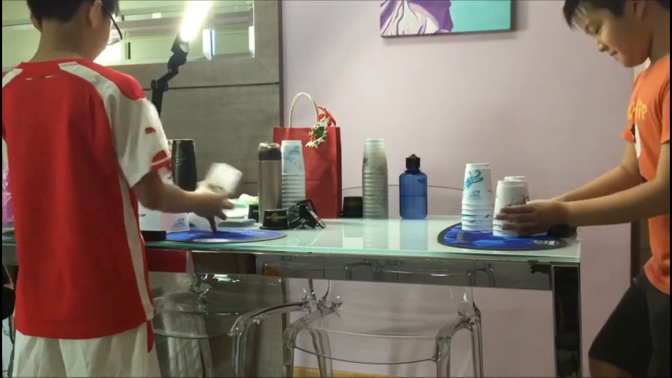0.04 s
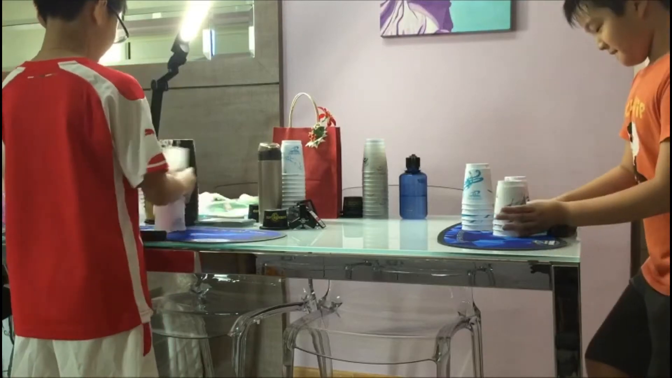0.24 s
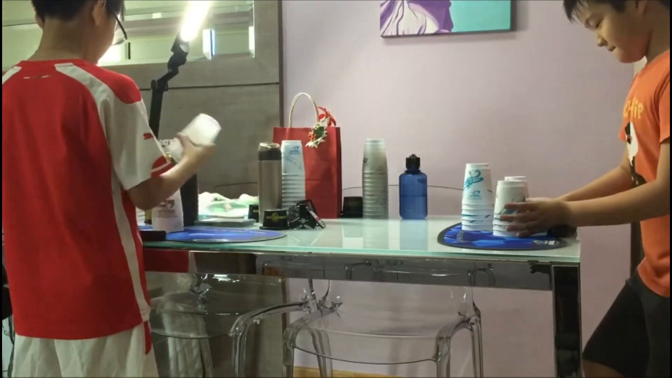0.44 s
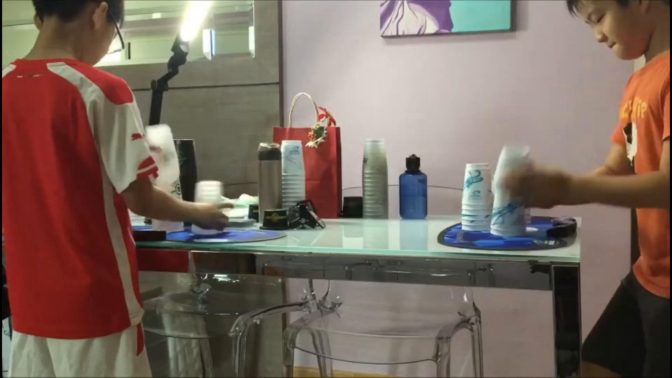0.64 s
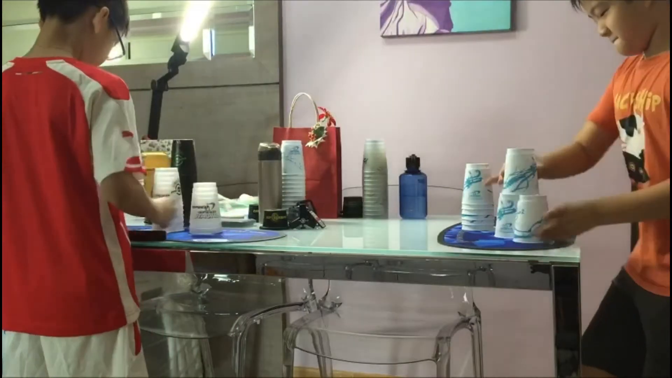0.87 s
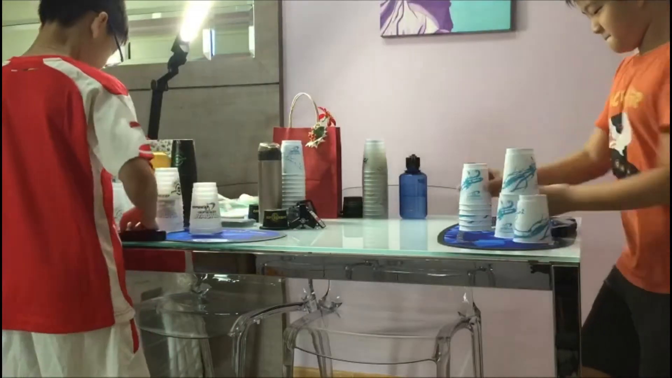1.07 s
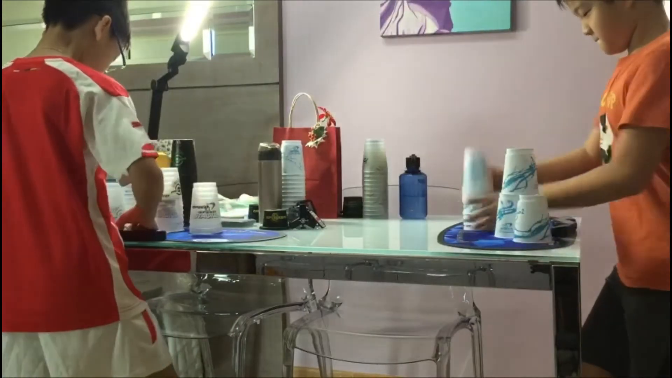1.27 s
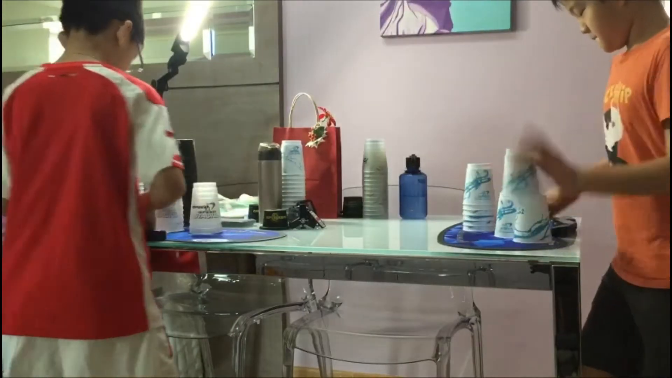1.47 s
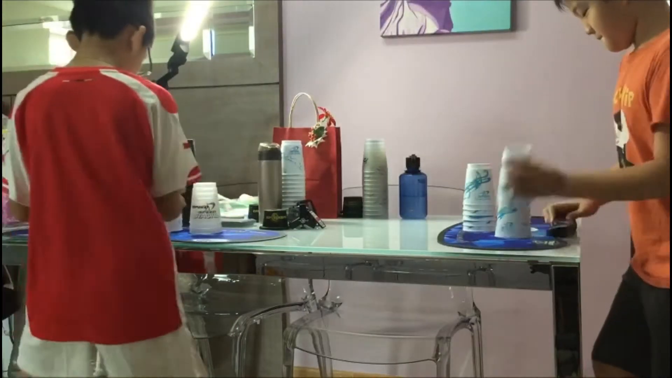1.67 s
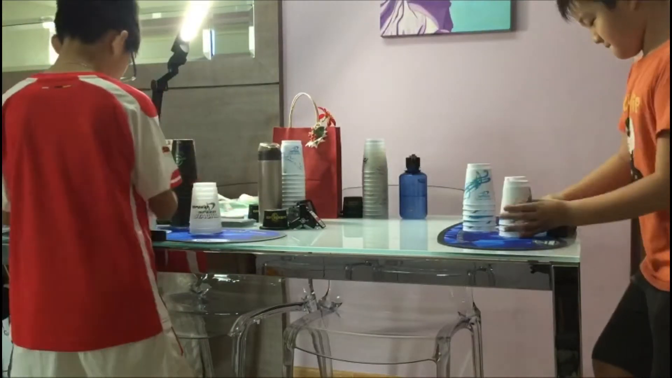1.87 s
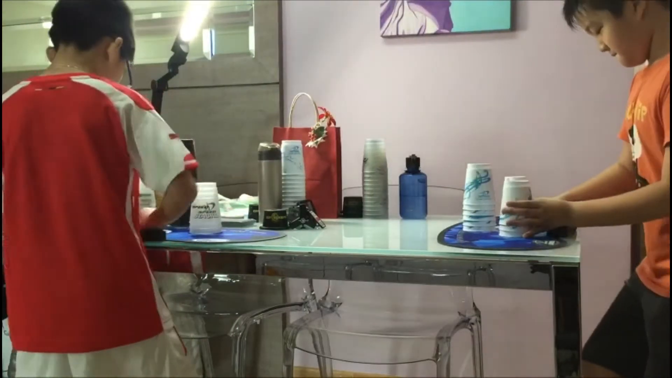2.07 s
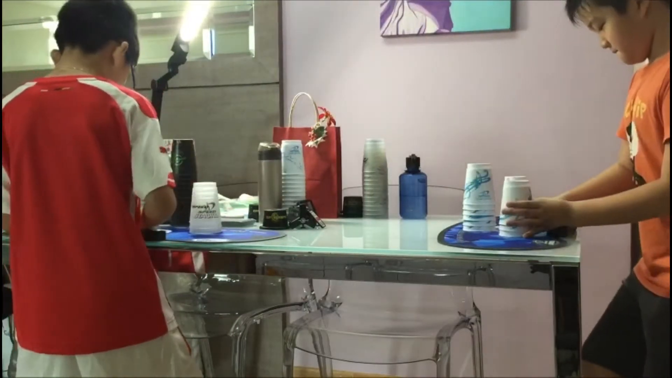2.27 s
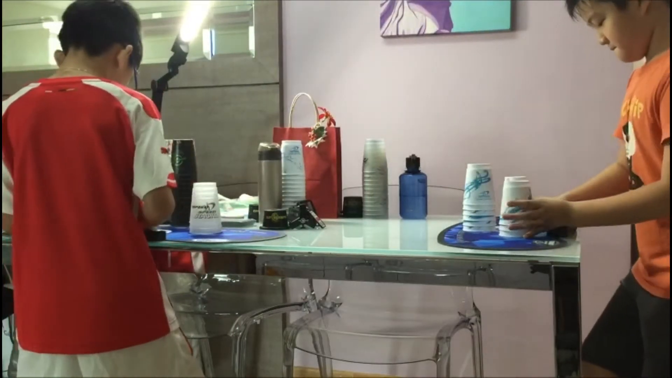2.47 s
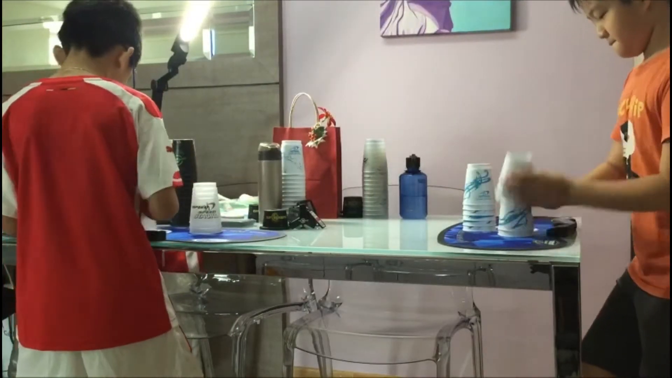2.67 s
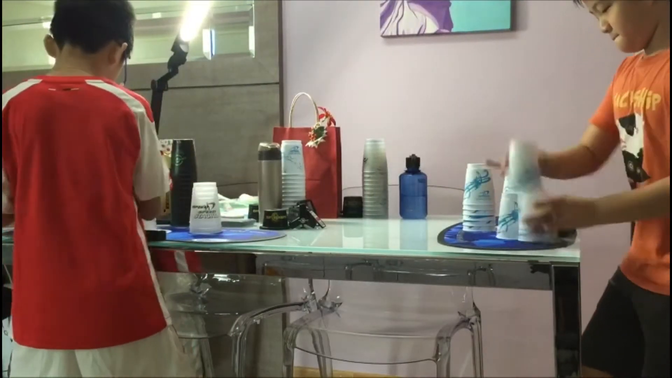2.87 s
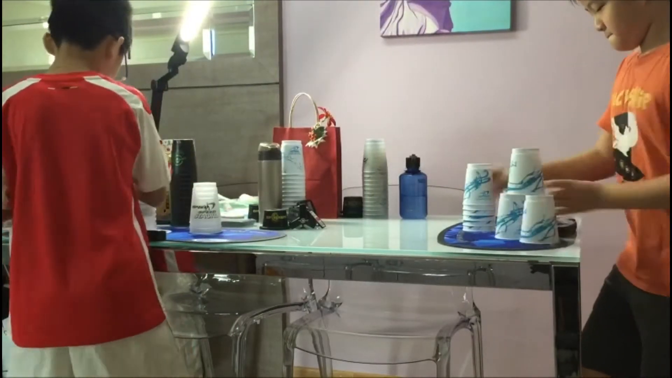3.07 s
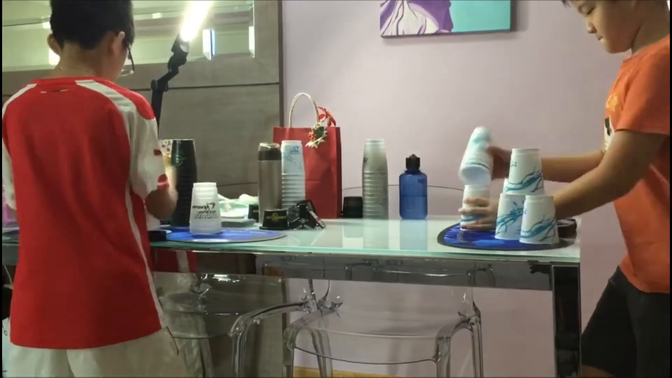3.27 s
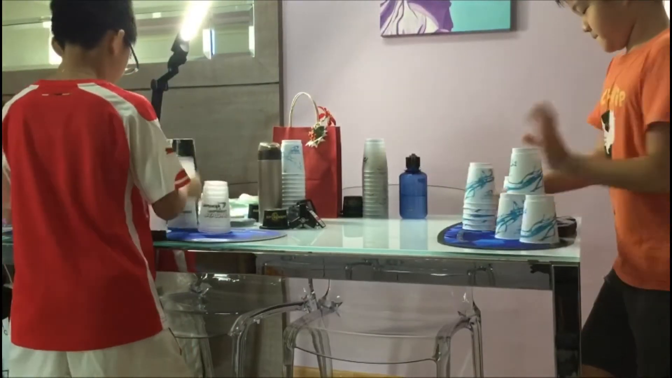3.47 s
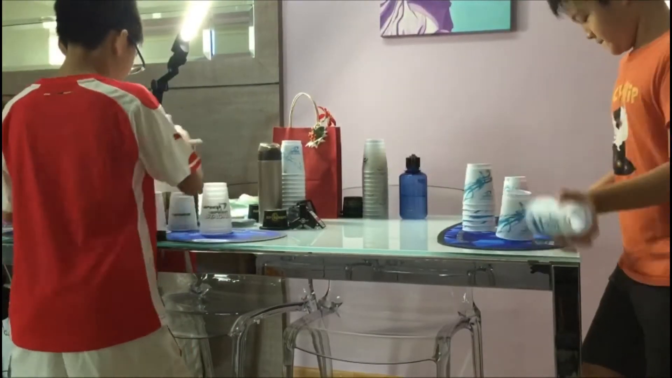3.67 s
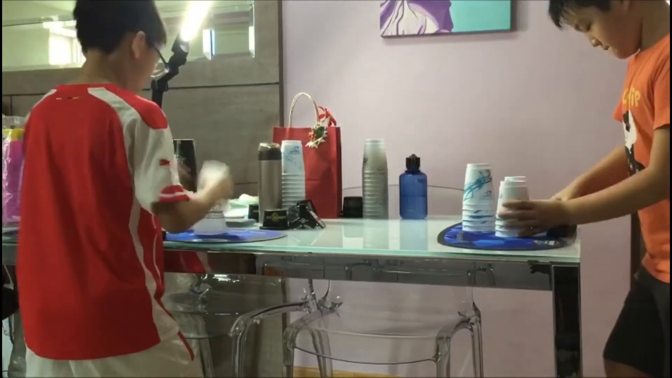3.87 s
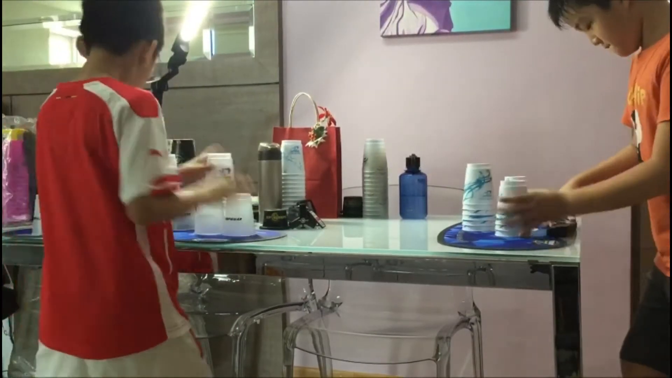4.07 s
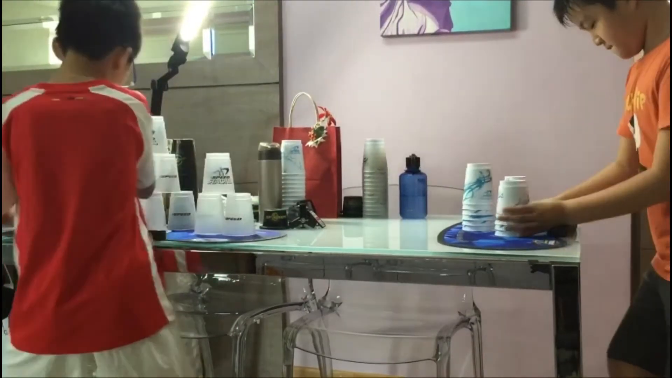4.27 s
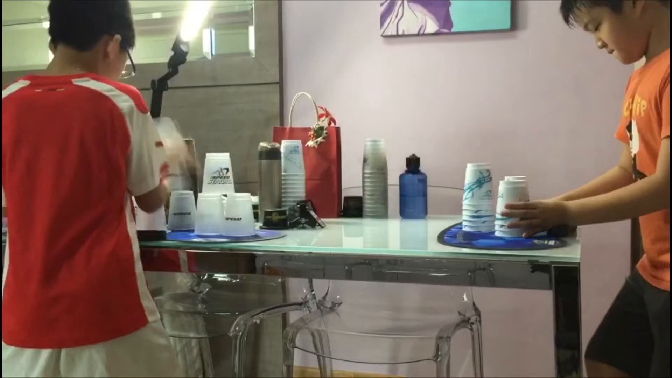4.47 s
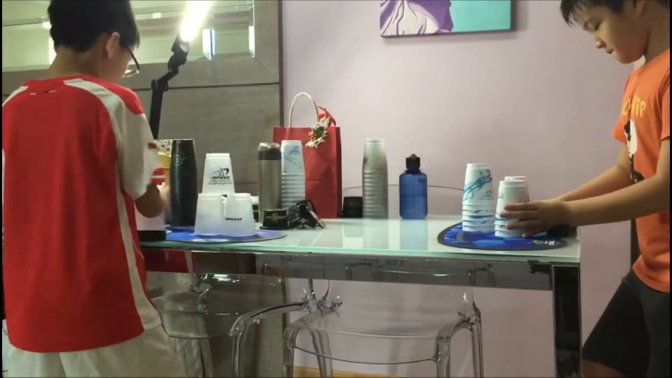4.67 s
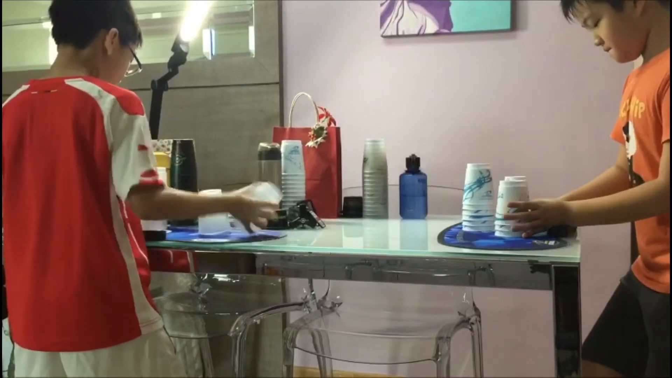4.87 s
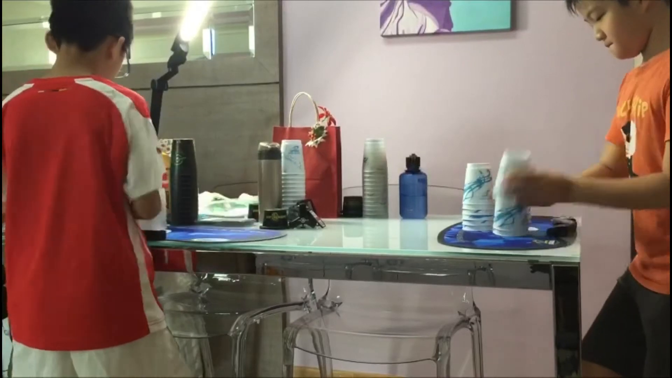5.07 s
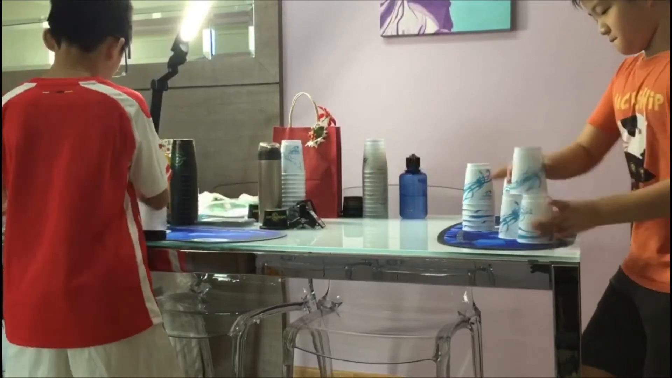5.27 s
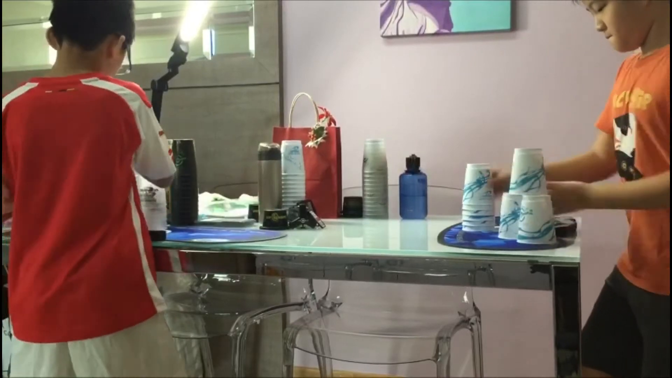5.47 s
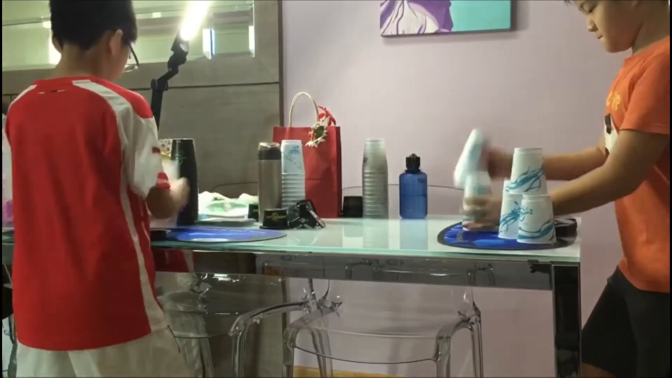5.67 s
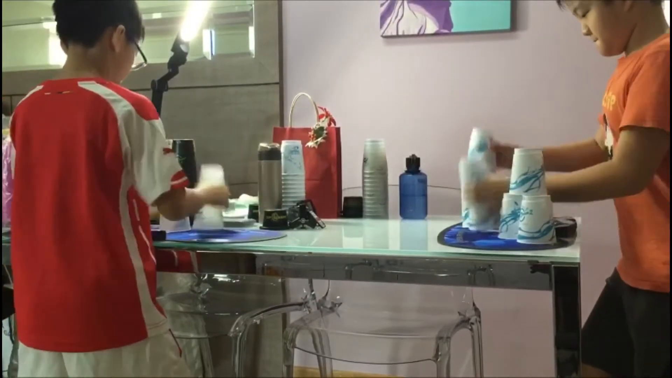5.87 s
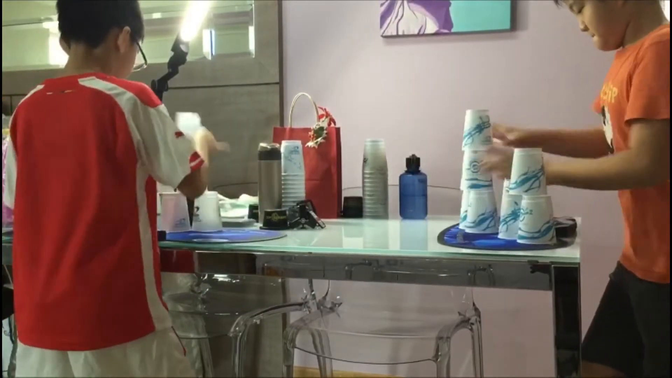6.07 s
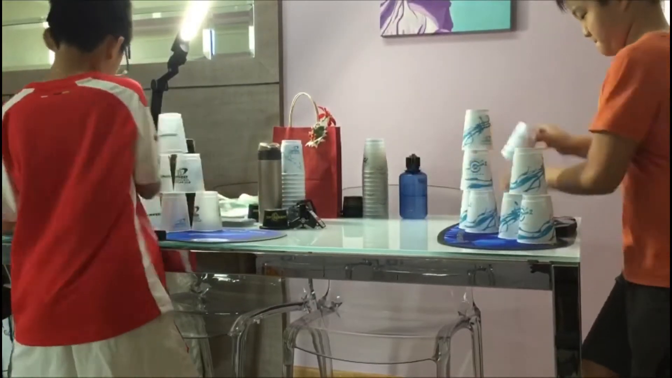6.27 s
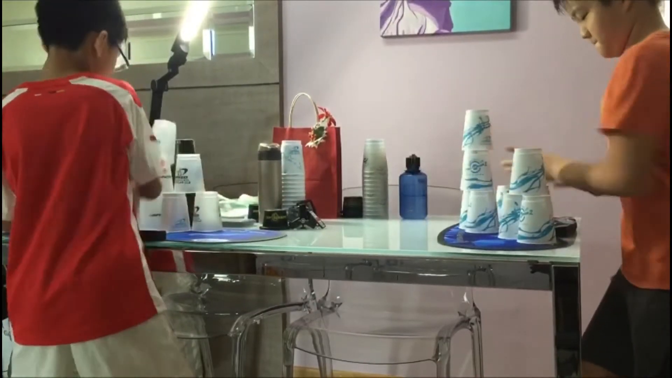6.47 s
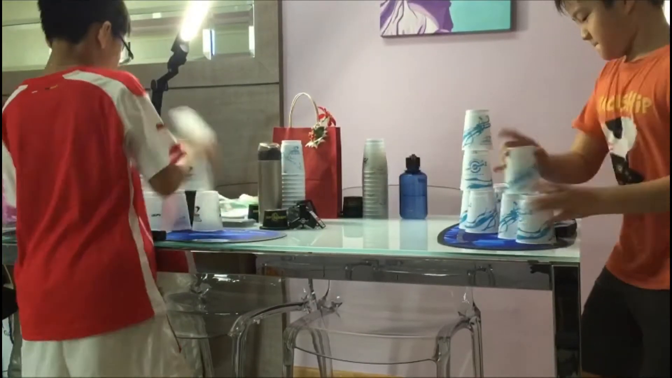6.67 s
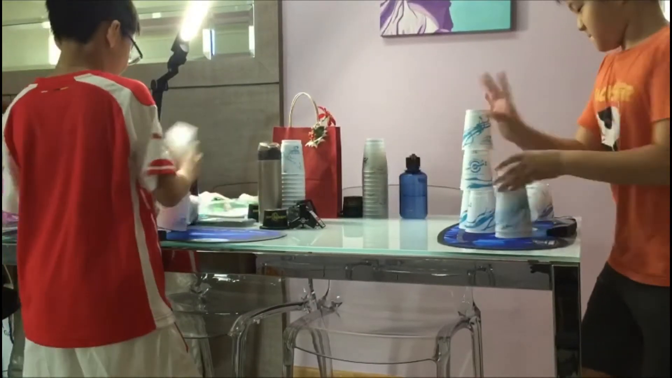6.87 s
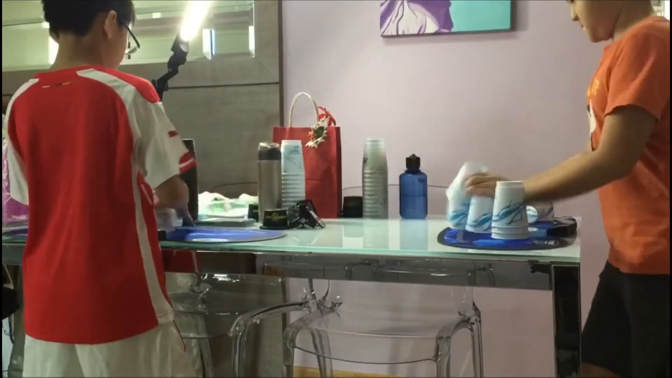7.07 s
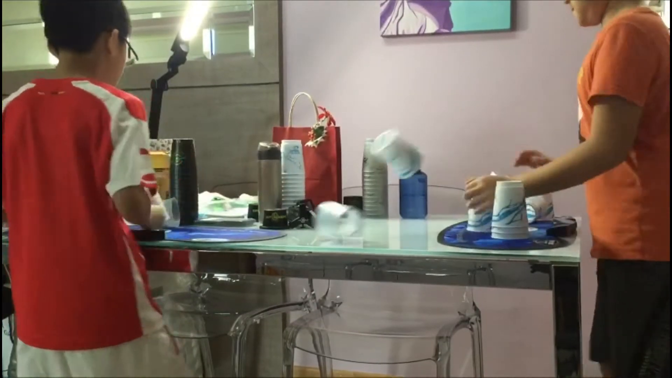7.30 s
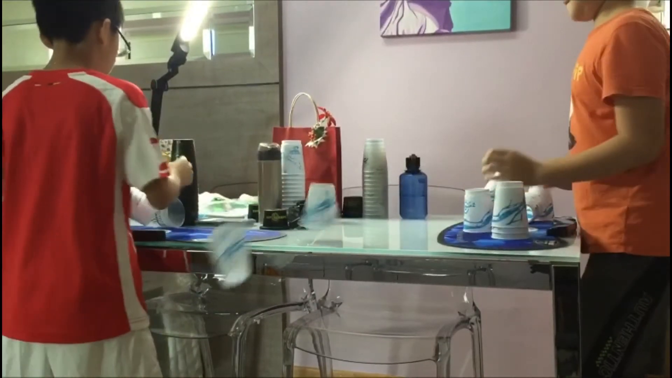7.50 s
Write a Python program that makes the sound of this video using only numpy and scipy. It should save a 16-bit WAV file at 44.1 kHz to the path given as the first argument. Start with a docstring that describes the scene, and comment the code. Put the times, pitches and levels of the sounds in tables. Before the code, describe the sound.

A faint, steady fan rush with low hum runs throughout. From 0 s plastic cups clack straight away: hollow mid-pitched knocks, small finger ticks and a dull table thump. A stronger hollow pop lands near 0.85 s, then scattered knocks and slides follow, with a crisp hit around 1.7 s. From about 2 to 2.8 s it nearly stops, leaving fan, weak taps and a soft low swell near 2.6 s. At 2.9 s the cups return, with the heaviest low bump near 3.4 s and sharp clacks at 3.6 and 3.8 s. After 4.2 s the clatter is dense and almost continuous, mixing nesting rattles, bright rim cracks and light touches. The loudest crack comes near 6.7 s with a table thud, then busy knocks continue to 7.5 s. Every hit leaves a short, diffuse tail from hard walls; the microphone sits a few steps away.

```python
"""Two children speed-stack plastic cups on mats on a glass table in a hard-walled room.
0 s: faint fan rush and hum throughout; cups land at once, fingers tick, the room rings on, the table booms.
2-2.8 s: few and weak landings, a low hum swell near 2.6 s. 2.8-4 s: busy again, hardest bump near 3.4 s.
4.3 s to the end: dense landings and touches, the loudest landing near 6.7 s.
Each landing is a rattle of contacts driving modes of air, wall and table and a noisy rim crack."""
import sys
import numpy as np
from scipy import signal
from scipy.fft import rfft, irfft
from scipy.io import wavfile
from scipy.ndimage import uniform_filter1d, minimum_filter1d

SR = 44100
rng = np.random.default_rng(int(sys.argv[2]) if len(sys.argv) > 2 else 0)


def wrap_up_sound(samples):
    """Save the sound to the file named by the first command line argument, as 16-bit audio."""
    columns = np.atleast_2d(samples).T
    # keep every value between -1 and 1, then stretch to whole-number steps
    tamed = np.clip(columns, -1, 1)
    steps = np.round(tamed * 32767).astype(np.int16)
    wavfile.write(sys.argv[1], SR, steps)


N = 332514

# Burst levels are set before the mix gains in scene(); mode and spectrum levels are relative.
# steady room noise: freq_hz, density_db [per Hz]
RUSH_SPECTRUM = [(25, -24), (55, 12), (110, 3.5), (160, 2.5), (350, -0.5), (700, 0.5), (1100, -2),
                 (1750, -1), (2500, -10), (4000, -22), (8000, -31.5), (16000, -36)]
# fan hum lines: freq_hz, mean_level_db
HUM_LINES = [(86.1, -62.5), (107.7, -68.5), (199.3, -67.5), (398.4, -67.5), (500.6, -72), (598.5, -61)]
# cup landings or nestings: start_s, rattle_s [time scale], hollow_pitch_hz,
# table_db, hollow_db, wall_db, rim_db
LANDINGS = [(.001, 0.023, 920, -50, -36.5, -39.5, -44.5), (0.0701, .011, 780, -35.5, -36, -34.5, -40),
            (.133, 0.0058, 820, -57, -37, -46, -47), (.239, 0.016, 940, -45.5, -40, -39, -42),
            (.321, 0.012, 845, -66, -41, -41.5, -46), (.514, .016, 767, -52, -58, -58, -62),
            (.611, .0045, 1124, -47, -42, -38, -49), (.65, 0.013, 880, -55, -39.5, -53, -50.5),
            (.664, 0.0064, 946, -45.5, -44, -42.5, -51), (.851, .01, 1020, -64, -41, -63, -59),
            (0.859, 0.0066, 1006, -43.5, -24.5, -41, -34.5), (.906, 0.016, 813, -38, -36, -41, -47),
            (1.145, 0.034, 850, -60, -56, -64, -62), (1.239, .003, 1180, -50, -43, -48, -49),
            (1.27, .016, 1150, -49, -56, -49, -48.5), (1.304, 0.0062, 1120, -47, -36, -40, -43),
            (1.478, .014, 1034, -55, -40, -62, -52.5), (1.51, 0.0062, 1062, -56, -30.5, -36.5, -42),
            (1.636, 0.0025, 1230, -75, -47, -38, -40.5), (1.7274, .0024, 1022, -43.5, -33.5, -29, -32),
            (1.963, 0.018, 890, -49.5, -45, -39.5, -48), (2.487, 0.0028, 870, -65, -66, -74, -79),
            (2.658, 0.021, 750, -61.5, -63, -70, -65), (2.758, .014, 1240, -59, -55.5, -57.5, -60.5),
            (2.889, 0.0054, 1000, -53.5, -35, -55, -51), (2.895, 0.0059, 983, -49, -28, -42, -38.5),
            (3.056, 0.0086, 863, -49.5, -39.5, -60, -60), (3.112, 0.034, 814, -46.5, -55, -62, -63),
            (3.238, .012, 675, -66, -49.5, -56.5, -62), (3.285, 0.0062, 836, -63, -52, -51, -60.5),
            (3.336, 0.0089, 710, -40.5, -46, -46.5, -49), (3.411, 0.0067, 1220, -45, -36, -38, -44),
            (3.435, .009, 1120, -40, -30, -32.5, -48.5), (3.493, .0076, 973, -52, -32.5, -36.5, -50),
            (3.585, 0.013, 1155, -59, -41, -51, -46.5), (3.603, .014, 1133, -54, -27.5, -37.5, -39.5),
            (3.627, .0019, 1365, -52, -29.5, -31, -30.5), (3.8291, 0.0047, 783, -44, -31.5, -31.5, -32),
            (4.022, 0.0098, 1050, -41, -26.5, -33, -56), (4.048, 0.0067, 967, -54, -29.5, -43.5, -42),
            (4.2208, 0.0029, 950, -52, -40.5, -36, -43.5), (4.265, 0.019, 848, -42, -35.5, -43.5, -44.5),
            (4.419, .022, 927, -44.5, -39.5, -39, -43), (4.455, .05, 865, -57, -39, -38, -41.5),
            (4.503, 0.024, 1065, -54, -27.5, -29, -34.5), (4.531, .011, 897, -33.5, -27.5, -41, -40.5),
            (4.636, 0.0038, 1050, -51, -35.5, -47, -46), (4.699, 0.033, 820, -48, -38.5, -41.5, -42.5),
            (4.842, 0.019, 946, -43, -35, -42.5, -45.5), (4.868, 0.0094, 885, -50, -38, -43, -38.5),
            (4.8748, .004, 1126, -46.5, -31.5, -31.5, -34), (4.961, 0.028, 770, -43.5, -38, -58, -47),
            (5.0198, 0.0036, 730, -63, -35, -38.5, -43.5), (5.266, 0.023, 990, -50.5, -36.5, -47, -43.5),
            (5.283, 0.0072, 940, -61, -24.5, -39, -38), (5.41, 0.035, 703, -61, -43.5, -62, -62),
            (5.489, 0.015, 850, -66, -38, -51, -50.5), (5.55, 0.021, 760, -65, -45, -63, -61),
            (5.619, 0.0038, 1230, -54, -41.5, -41.5, -47), (5.664, .047, 1010, -53, -44.5, -47, -53.5),
            (5.745, .017, 1095, -46, -32, -34, -41.5), (5.849, 0.0065, 1080, -42.5, -29.5, -35.5, -43.5),
            (5.991, .013, 840, -49, -30, -38, -42), (6.152, 0.007, 810, -62, -36.5, -51, -51),
            (6.25, .03, 760, -55, -46, -56, -56), (6.307, 0.031, 1080, -46, -38, -52, -48.5),
            (6.333, 0.028, 1180, -55, -31, -38, -40.5), (6.365, .011, 1012, -38.5, -26, -41, -41.5),
            (6.44, 0.014, 1044, -41, -35, -32.5, -37), (6.505, .02, 797, -47, -36, -57, -53),
            (6.563, .026, 910, -46.5, -35, -41.5, -41.5), (6.663, 0.015, 1000, -58, -44, -41, -40.5),
            (6.679, 0.0084, 1119, -28.5, -15.5, -25.5, -25), (6.703, .02, 1090, -31.5, -26, -27.5, -32),
            (6.81, 0.033, 1040, -41.5, -51, -41, -41), (6.841, 0.0085, 972, -35.5, -34, -39, -45),
            (6.89, 0.03, 844, -56, -35.5, -42.5, -43.5), (6.985, 0.033, 1040, -54, -42, -39.5, -43.5),
            (7.063, .012, 862, -40.5, -32.5, -37.5, -39), (7.132, 0.018, 1044, -34, -30.5, -35, -42.5),
            (7.2, .0055, 850, -52, -46, -53, -45.5), (7.265, 0.026, 850, -45.5, -42.5, -42.5, -48.5),
            (7.351, 0.008, 1090, -67, -51, -47.5, -52.5), (7.457, 0.0025, 1220, -45.5, -35.5, -35, -40)]
# air in and between the cups: freq_hz, level_db, t60_s
AIR_MODES = [(570, -21.5, 0.12), (606, 2.5, 0.037), (728, 2, 0.021), (858, -2, 0.031), (971, -5.5, 0.043),
             (1125, 1.5, 0.017), (1230, 0, 0.029), (1452, 5, 0.015)]
# bending of the cup wall: freq_hz, level_db, t60_s
WALL_MODES = [(1660, 0, 0.028), (1736, -3, 0.068), (1943, -3, 0.039), (2138, 3.5, 0.011),
              (2500, -2, 0.0093), (2530, -4, 0.02), (2900, -8, 0.054), (3213, 2.5, 0.028),
              (3324, -8.5, 0.07), (3570, -16, 0.003)]
# crack of rim on rim: freq_hz, level_db
RIM_SPECTRUM = [(2000, -20), (3300, -2), (4100, 3), (4900, -1.5), (5500, 2.5), (6500, -1.5), (7400, -5),
                (9400, -5.5), (10300, -11.5), (12000, -10.5), (15500, -16), (18000, -32)]
# table top under the mats: freq_hz, level_db, t60_s
TABLE_MODES = [(122.3, -11.5, 0.15), (165, -5.5, 0.059), (233.8, -0.5, 0.09), (289.5, -0.5, 0.063),
               (332.5, 0.5, 0.074), (440, 7, 0.024)]
# notes held by a free-standing cup: ratio [x hollow pitch], level_db [re hollow knock], t60_s
HOLLOW_NOTES = [(.76, -10, 0.11), (1.251, -8, 0.075)]
# room decay: freq_hz, t60_s
ROOM_DECAY = [(100, 0.76), (300, 0.47), (800, 0.54), (2000, 0.54), (5500, 0.58), (9000, .44), (15000, 0.27)]
# light touches of fingers and cups: start_s, end_s, mean_level_db
HANDLING_SPANS = [(0, .25, -56), (.9, 2.05, -62), (2.803, 3.952, -54), (4.302, 7.5, -50.5)]
# dull table bumps, and a low hum swell near 2.6 s: start_s, level_db, swell_s, centre_hz
LOW_SWELLS = [(0.077, -38, 0.029, 135), (.301, -46.5, .045, 110), (.899, -43, .012, 135),
              (1.272, -46.5, 0.032, 100), (1.723, -49, 0.012, 73), (2.6, -50.5, 0.059, 88),
              (3.201, -48.5, 0.027, 55), (3.442, -31.5, 0.0046, 75), (4.258, -46, 0.009, 48.1),
              (5.2, -46, 0.01, 51.3), (5.548, -49, 0.0089, 60.4), (6.706, -37, 0.01, 125),
              (6.853, -41, 0.021, 91), (7.129, -38.5, 0.011, 150)]
# low boom: freq_hz, level_db
BOOM_SPECTRUM = [(25, -10), (45, -3), (72, 0.5), (95, -8), (122, -4), (170, -4), (300, -26)]

RING_SAMPLES, CLACK_SAMPLES = int(SR * .1), int(SR * .25)
ENERGY_SPAN_S, TOP_HZ, RUSH_RMS_DB = .1, 15900, -54
# a cup that rattles longer than the choke time is still in the hand, which damps its notes
NOTE_BUILD_S, NOTE_CHOKE_S = 0.0068, 0.017
# wall pitch rises as the rim takes more of the blow
WALL_HZ, WALL_HZ_PER_DB = 2245, 18
# rim tilt above 5 kHz, dB per octave: per halving of rattle time, and per dB of rim over its usual level
PLAIN_RATTLE_S, TILT_DB_PER_HALVING = .009, -0.06
PLAIN_RIM_RE_HOLLOW_DB, TILT_DB_PER_RIM_DB = -7.5, 0.32
# hollow knocks above this level send less into the room: dB less for each dB more
BEAM_FROM_DB, BEAM_DB_PER_DB = -31.5, 0.53
TOUCHES_PER_S, TOUCH_RATTLE_S, TOUCH_MEDIAN_HZ = 8.4, .012, 850
TOUCH_TABLE_DB, TOUCH_WALL_DB, TOUCH_RIM_DB = -6, -5, -10.5  # re hollow knock


def undb(db):
    """Decibels to gain."""
    return 10 ** (np.asarray(db) / 20)


def burst_level(x, level_db):
    """Give a burst the energy of ENERGY_SPAN_S at this RMS level."""
    return x * undb(level_db) * np.sqrt(ENERGY_SPAN_S * SR / np.sum(x ** 2))


def add(track, start_s, x):
    """Mix x into the track."""
    i = max(int(start_s * SR), 0)
    track[i:i + len(x)] += x[:max(len(track) - i, 0)]


def on_log_axis(freq_hz, points):
    """Interpolate (Hz, value) points over log frequency."""
    point_hz, value = np.transpose(points)
    return np.interp(np.log(np.maximum(freq_hz, 1)), np.log(point_hz), value)


def colour(x, points, size=8192):
    """Causal minimum-phase filter with the spectrum of (Hz, dB) points."""
    gain = undb(on_log_axis(np.fft.rfftfreq(size, 1 / SR), points))
    cepstrum = irfft(np.log(gain))
    # fold onto positive time
    cepstrum[1:size // 2] *= 2
    cepstrum[size // 2 + 1:] = 0
    response = irfft(np.exp(rfft(cepstrum)))
    return signal.fftconvolve(x, response)[:len(x)]


def favour(points, centre_hz, focus_db):
    """Weaken (Hz, dB, ..) rows by focus_db times squared octaves from the centre."""
    rows = np.array(points, float)
    rows[:, 1] -= focus_db * np.log2(rows[:, 0] / centre_hz) ** 2
    return rows


def fan():
    """Coloured noise for rushing air, plus hum lines that waver in level and phase."""
    t = np.arange(N) / SR
    rush = colour(rng.standard_normal(N), RUSH_SPECTRUM)
    out = rush * undb(RUSH_RMS_DB) / np.std(rush)
    knots_s = np.linspace(0, t[-1], num=90)
    for freq_hz, mean_db in HUM_LINES:
        swell = np.interp(t, knots_s, rng.standard_normal(size=90))
        drift_rad = np.interp(t, knots_s, rng.standard_normal(size=90))
        tone = np.sin(2 * np.pi * freq_hz * t + drift_rad)
        out += np.sqrt(2) * undb(mean_db + 2 * swell) * tone
    return out


def rattle(rattle_s, sharp_db=15, soften_db=4, scatter_db=4, count=44):
    """A first contact, then others that weaken and thin out as the cup settles."""
    rattle_s = max(rattle_s, 1 / SR)
    share = (np.arange(count) + rng.random(count)) / count
    times_s = -2 * rattle_s * np.log(1 - share)
    sizes = np.sqrt(1 - share) * undb(scatter_db * rng.standard_normal(count))
    # a square hit is nearly one click; a long slide begins gently
    times_s[0] = 0
    sizes[0] = undb(sharp_db - soften_db * np.log2(rattle_s / 0.0021))
    push = np.zeros(CLACK_SAMPLES)
    index = np.minimum(times_s * SR, CLACK_SAMPLES - 1).astype(int)
    np.add.at(push, index, sizes * rng.choice([-1, 1], count))
    return push


def ring(push, modes, detune, low_hz):
    """Contacts excite damped, randomly detuned modes; a small body radiates little below low_hz."""
    freq_hz, level_db, t60_s = np.transpose(modes)[:, :, None]
    t = np.arange(RING_SAMPLES) / SR
    freq_hz = freq_hz * (1 + detune * rng.standard_normal(freq_hz.shape))
    sign = rng.choice([-1, 1], freq_hz.shape)
    decay = np.exp(-np.log(1000) * t / t60_s)
    response = np.sum(sign * undb(level_db) * decay * np.sin(2 * np.pi * freq_hz * t), axis=0)
    highpass = signal.butter(2, low_hz, "high", fs=SR, output="sos")
    response = signal.sosfilt(highpass, response)
    return signal.fftconvolve(push, response)[:len(push)]


def rim_crack(push, rattle_s, rim_re_hollow_db, crack_s=0.0019):
    """Close, fast-dying high modes: each contact gives a fresh burst of coloured noise."""
    power = signal.lfilter([1], [1, -np.exp(-2 / SR / crack_s)], push ** 2 + 1e-18)
    crack = np.sqrt(power) * rng.standard_normal(CLACK_SAMPLES)
    # edge on edge is bright, a blow cushioned by trapped air is dull
    tilt_db = TILT_DB_PER_HALVING * np.log2(PLAIN_RATTLE_S / rattle_s)
    tilt_db += TILT_DB_PER_RIM_DB * (rim_re_hollow_db - PLAIN_RIM_RE_HOLLOW_DB)
    spectrum = np.array(RIM_SPECTRUM, float)
    spectrum[:, 1] += tilt_db * np.log2(np.maximum(spectrum[:, 0] / 5000, 1))
    return colour(crack, spectrum)


def clack(rattle_s, air_hz, table_db, hollow_db, wall_db, rim_db, mat_lag_s=0.00707):
    """One cup lands: the same contacts drive enclosed air, wall, rim and table."""
    push = rattle(rattle_s)
    # nesting depth picks the air modes, the place struck picks the wall modes
    wall_hz = max(WALL_HZ + WALL_HZ_PER_DB * (rim_db - wall_db), air_hz)
    hollow = ring(push, favour(AIR_MODES, air_hz, focus_db=16), detune=0.028, low_hz=485)
    wall = ring(push, favour(WALL_MODES, wall_hz, focus_db=22.5), detune=0.048, low_hz=1270)
    rim = rim_crack(push, rattle_s, rim_db - hollow_db)
    table = ring(push, TABLE_MODES, detune=0.027, low_hz=100)
    out = burst_level(hollow, hollow_db) + burst_level(wall, wall_db) + burst_level(rim, rim_db)
    # the soft mat passes the blow on late
    add(out, mat_lag_s, burst_level(table, table_db))
    return out


def held_notes(rattle_s, air_hz, hollow_db, detune=0.0085):
    """A cup let go quickly rings on with two hollow notes."""
    ratio, level_db, t60_s = np.transpose(HOLLOW_NOTES)[:, :, None]
    t = np.arange(CLACK_SAMPLES) / SR
    freq_hz = air_hz * ratio * (1 + detune * rng.standard_normal(ratio.shape))
    envelope = (1 - np.exp(-t / NOTE_BUILD_S)) * np.exp(-np.log(1000) * t / t60_s)
    tones = envelope * np.sin(2 * np.pi * freq_hz * t)
    free = 1 / (1 + (rattle_s / NOTE_CHOKE_S) ** 2)
    return free * sum(burst_level(tone, hollow_db + db) for tone, db in zip(tones, level_db))


def cups():
    """All landings: direct sound with held notes, and the knocks fed to the room."""
    direct, spread = np.zeros(N), np.zeros(N)
    for start_s, rattle_s, air_hz, table_db, hollow_db, wall_db, rim_db in LANDINGS:
        knock = clack(rattle_s, air_hz, table_db, hollow_db, wall_db, rim_db)
        add(direct, start_s, knock + held_notes(rattle_s, air_hz, hollow_db))
        # the strongest hollow knocks pop from the open mouth of a stack and sound drier
        beam_db = BEAM_DB_PER_DB * max(hollow_db - BEAM_FROM_DB, 0)
        add(spread, start_s, knock * undb(-beam_db))
    return direct, spread


def room(x, gap_s=.003, knee_hz=250, count=56):
    """Diffuse field: noise bands follow stored energy, which dies away at each band's own rate."""
    edges_hz = np.geomspace(45 + knee_hz, TOP_HZ + knee_hz, count) - knee_hz
    out = np.zeros(N)
    for low_hz, high_hz in zip(edges_hz, edges_hz[1:]):
        band = signal.butter(3, [low_hz, high_hz], "band", fs=SR, output="sos")
        t60_s = on_log_axis(np.sqrt(low_hz * high_hz), ROOM_DECAY)
        keep = np.exp(-2 * np.log(1000) / SR / t60_s)
        noise = rng.standard_normal(N)
        power = signal.sosfilt(band, x + 1e-9 * noise) ** 2
        stored = signal.lfilter([1 - keep], [1, -keep], power)
        echoes = signal.sosfilt(band, noise)
        add(out, gap_s, np.sqrt(stored) * echoes / np.std(echoes))
    return out


def touches(scatter_db=3, pitch_spread=0.38):
    """Faint clacks, one at a random time per slot, while hands grip and shift the cups."""
    out = np.zeros(N)
    slot_s = 1 / TOUCHES_PER_S
    for start_s, end_s, mean_db in HANDLING_SPANS:
        for slot_start_s in np.arange(start_s, end_s, slot_s):
            pitch, strength = rng.standard_normal(2)
            db = mean_db + scatter_db * strength
            air_hz = TOUCH_MEDIAN_HZ * np.exp(pitch_spread * pitch)
            touch = clack(TOUCH_RATTLE_S, air_hz, db + TOUCH_TABLE_DB, db,
                          db + TOUCH_WALL_DB, db + TOUCH_RIM_DB)
            add(out, rng.uniform(slot_start_s, min(slot_start_s + slot_s, end_s)), touch)
    return out


def low_swells():
    """Low swelling noise: table bumps and a hum swell."""
    out, t = np.zeros(N), np.arange(CLACK_SAMPLES) / SR
    for start_s, level_db, swell_s, centre_hz in LOW_SWELLS:
        swell = rng.standard_normal(CLACK_SAMPLES) * t * np.exp(-t / swell_s)
        boom = colour(swell, favour(BOOM_SPECTRUM, centre_hz, focus_db=6.5))
        add(out, start_s, burst_level(boom, level_db))
    return out


def scene(direct_db=2, room_db=0.68, boom_room_db=-11):
    """Fan, cups, touches and low swells, with the room's reply to all but the fan."""
    hum = fan()
    direct, spread = cups()
    handling = touches()
    boom = low_swells()
    tail = room(undb(room_db) * (spread + handling) + undb(boom_room_db) * boom)
    return (undb(direct_db) * (direct + handling) + boom + tail + hum)[None]


def record(dry, ceiling_db=-6, hold_s=0.00077):
    """A fast limiter holds down the loudest peaks; a lowpass cuts above TOP_HZ."""
    span = max(int(hold_s * SR), 1)
    gain = undb(ceiling_db) / np.maximum(np.abs(dry), undb(ceiling_db))
    gain = uniform_filter1d(minimum_filter1d(gain, span), span)
    lowpass = signal.ellip(8, .2, 70, TOP_HZ, fs=SR, output="sos")
    return signal.sosfilt(lowpass, dry * gain)


dry = scene()
out = record(dry)
wrap_up_sound(out)
```